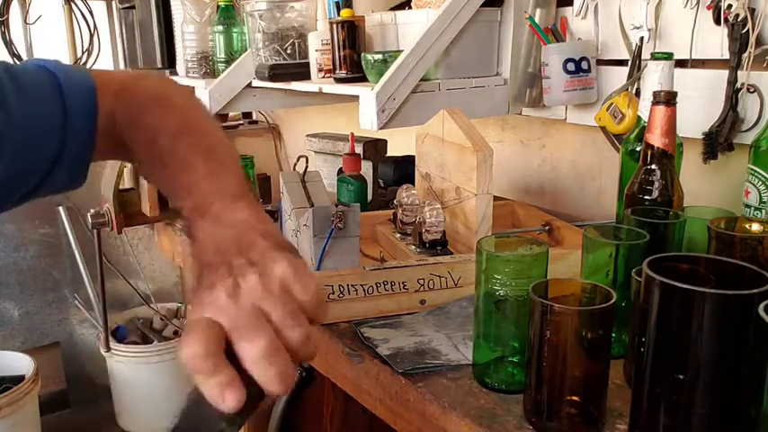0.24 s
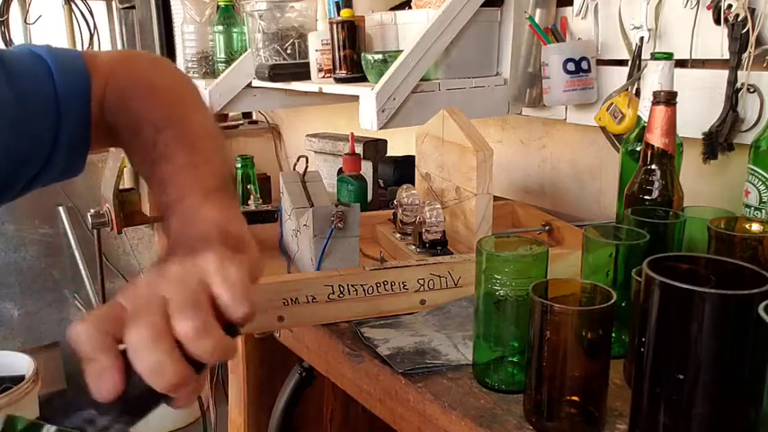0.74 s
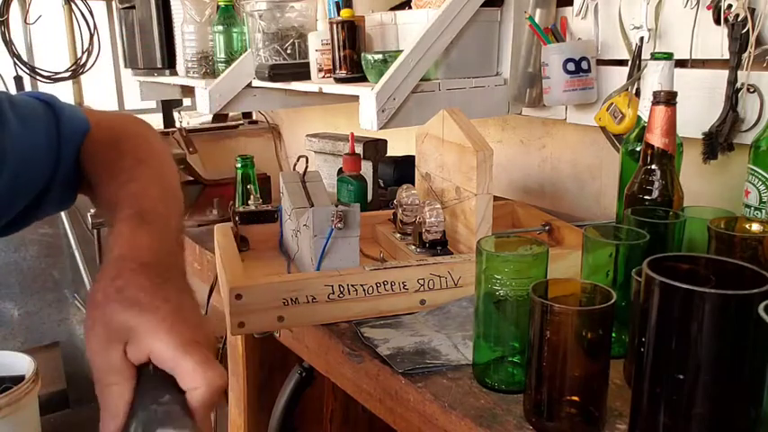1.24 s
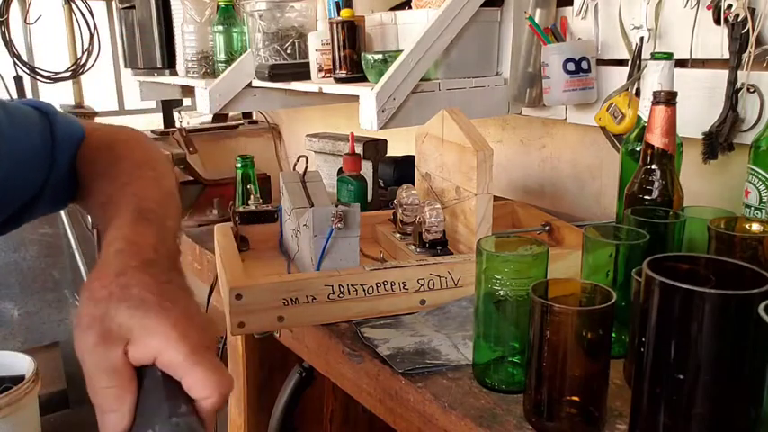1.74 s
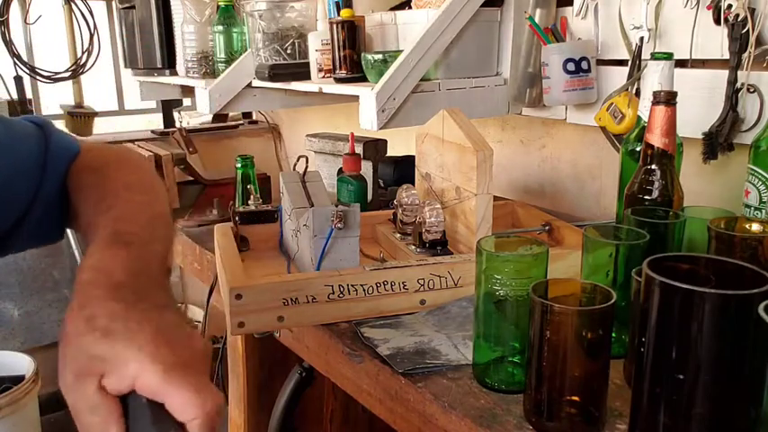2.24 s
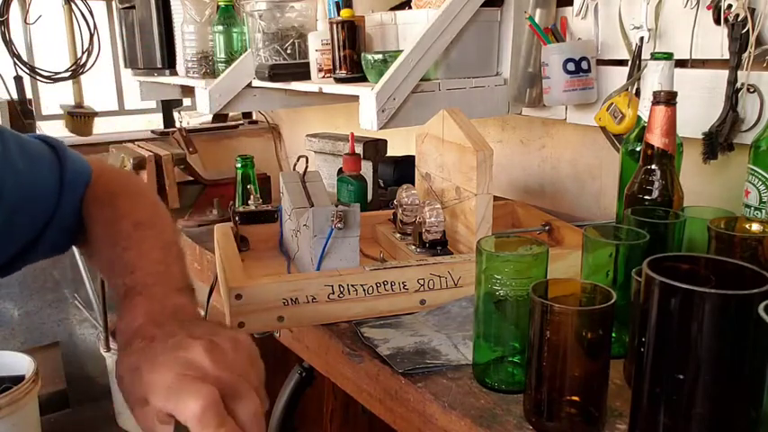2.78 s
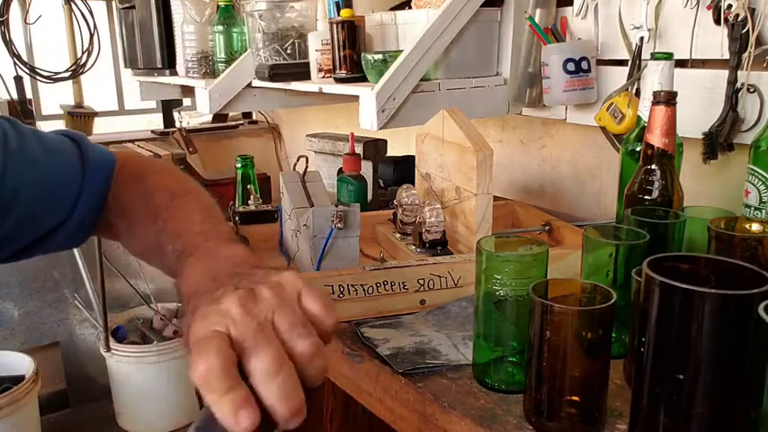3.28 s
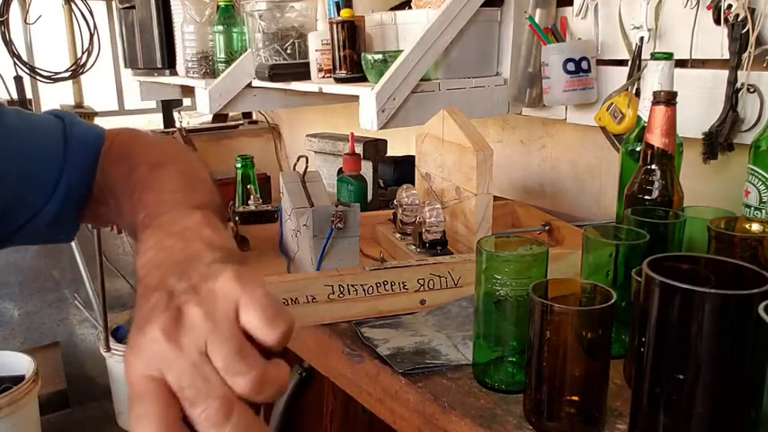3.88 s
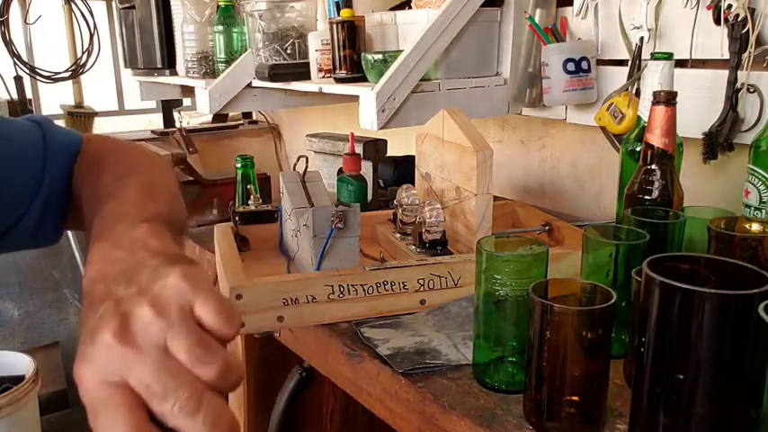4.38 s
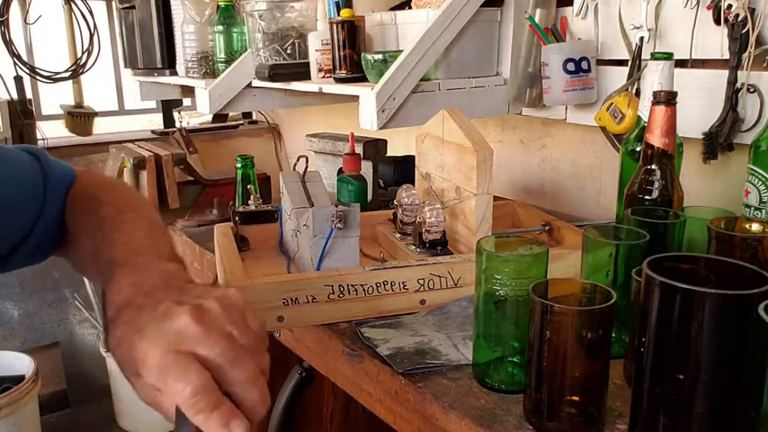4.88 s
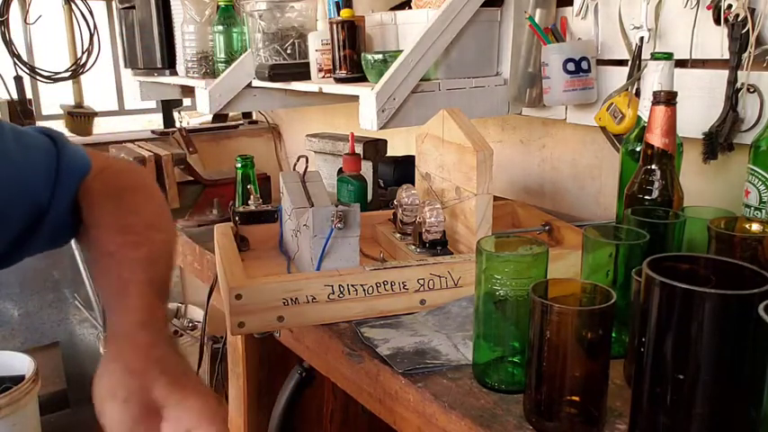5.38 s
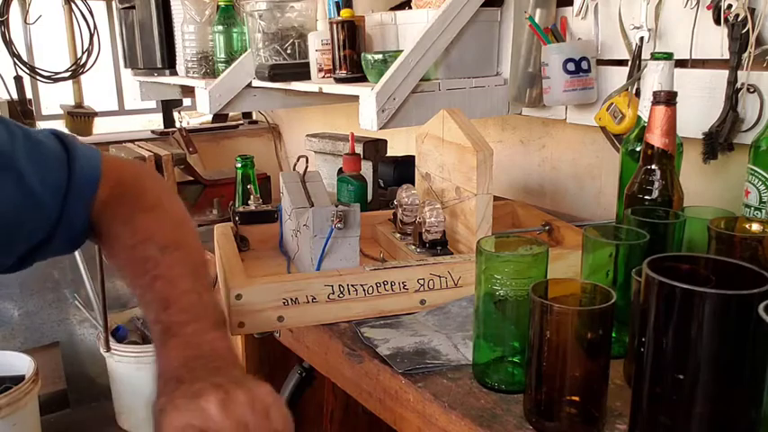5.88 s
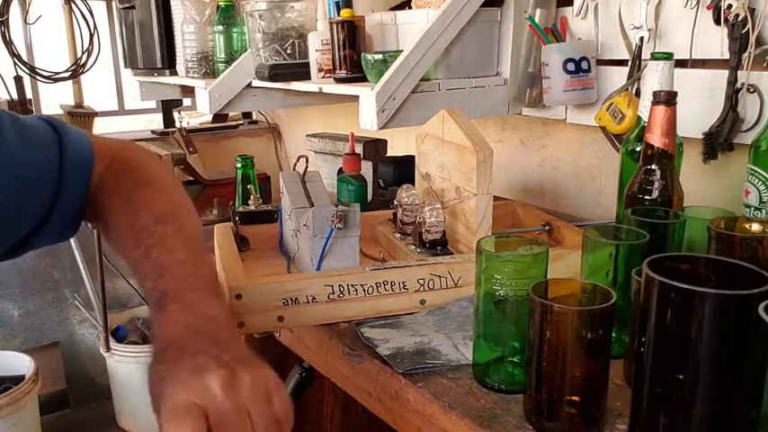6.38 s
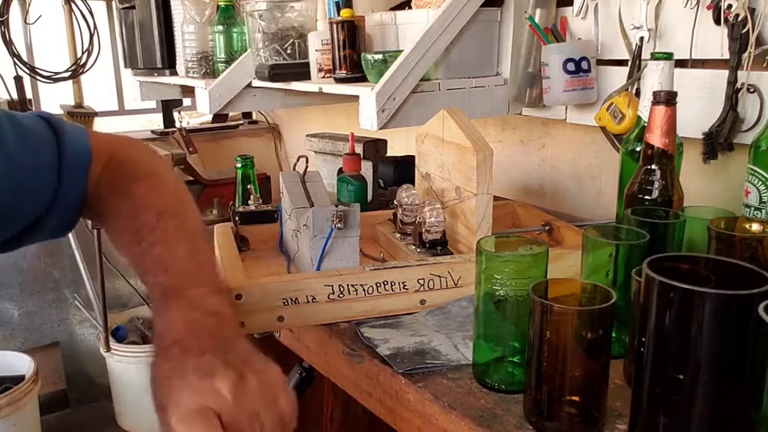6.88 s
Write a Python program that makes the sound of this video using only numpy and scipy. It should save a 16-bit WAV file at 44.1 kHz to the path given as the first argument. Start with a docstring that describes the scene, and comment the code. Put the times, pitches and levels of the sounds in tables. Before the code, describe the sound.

Close, gritty scraping of abrasive paper on glass, alternating slow drags and rapid scrubbing, with a slight hollow bottle resonance and distant motor hum.

```python
"""In a workshop, sandpaper is rubbed along the cut rim of a glass bottle: long sweeps, quick strokes, long sweeps.
Random grain clicks excite the glass, whose hand-damped modes colour the rasp; its level follows the hand.
Friction also stirs the air in the bottle: narrow noise bands sound under the rasp, and jolts make the hollow ring.
Far off a motor, three sine harmonics, slowly gathers speed beside a fading steady tone; shaped noise is the air.
"""
import sys
import numpy as np
from scipy.fft import rfft, irfft, next_fast_len
from scipy.io import wavfile
from scipy.ndimage import map_coordinates

SR = 44100
rng = np.random.default_rng(int(sys.argv[2]) if len(sys.argv) > 2 else 0)


def generate_wav(signal):
    """Clip the signal to [-1, 1] and save it as 16-bit WAV at the path in sys.argv[1]."""
    frames = np.transpose(np.atleast_2d(signal))
    scaled = np.clip(frames, -1, 1) * 32767
    pcm = np.round(scaled).astype(np.int16)
    wavfile.write(sys.argv[1], SR, pcm)


N = 314433
TIME = np.arange(N) / SR
SIZE = next_fast_len(N)
FREQS = np.maximum(np.arange(SIZE // 2 + 1) * SR / SIZE, 1)
FULL_SPEED_DB = -32   # rasp level that counts as full speed of the hand


def from_db(db):
    """Logarithmic level: decibels to amplitude gain."""
    return 10 ** (np.asarray(db) / 20)


def rms_one(x):
    """Power normalisation: scale to a mean square of one."""
    return x / np.sqrt(np.mean(np.abs(x) ** 2) + 1e-20)


def in_time(rows):
    """Linear interpolation: each column of a time table at every sample."""
    s, *columns = np.transpose(rows)
    return [np.interp(TIME, s, column) for column in columns]


def over_hz(points):
    """Logarithmic frequency scale: a table joined by straight lines on that axis."""
    hz, value = np.transpose(points)
    return np.interp(np.log(FREQS), np.log(hz), value)


def drift(rate, size=8192):
    """Low-passed noise: random motion of spread 1, changing up to about rate times a second."""
    hz = np.arange(size // 2 + 1) * SR / N
    slow = irfft(rfft(rng.standard_normal(size)) / (1 + (hz / rate) ** 4), size)
    return np.interp(np.arange(N) * size / N, np.arange(size), rms_one(slow))


def below(hz, order):
    """Butterworth response: magnitude of a low-pass."""
    return 1 / np.sqrt(1 + (FREQS / hz) ** (2 * order))


def coloured(spectrum, gain):
    """Spectral shaping: sound of a spectrum under a gain curve, at unit power."""
    return rms_one(irfft(spectrum * gain, SIZE)[:, :N])


def band(spectrum, hz, width_hz):
    """Lorentzian weighting: sound of one band of a spectrum."""
    offset = (2 * (FREQS - hz) / width_hz) ** 2
    return irfft(spectrum / (1 + offset ** 2), SIZE)[:, :N]


def swell(x, hz, width_hz, lift_db):
    """Time-varying resonance: raise or lower one band by a changing amount."""
    return x + (from_db(lift_db) - 1) * band(rfft(x, SIZE), hz, width_hz)


# likeness of the two channels: [f/Hz, correlation/1]
CHANNEL_LIKENESS = [(60, 0.89), (400, 0.96), (650, 1), (1100, 0.54), (1600, 0.44), (2250, 0.2),
                    (2900, 0.54), (4300, 0.29), (6300, 0.26), (9000, 0.12), (12600, 0.15)]
# lead of the left channel in the direct sound: [f/Hz, phase/rad]
LEFT_LEAD = [(100, 0.2), (780, 0.59), (1850, 0.79), (2220, 1.1), (2600, 0.19), (3300, 0.12), (6300, 0.7),
             (8000, 2.1), (12600, 3)]


def spread(sources):
    """Interaural coherence: one signal arrives directly, two unrelated ones are scattered, one to each side."""
    direct, *scattered = rfft(sources, SIZE)
    alike = over_hz(CHANNEL_LIKENESS)
    direct_pair = np.array([direct, direct * np.exp(-1j * over_hz(LEFT_LEAD))])
    return np.sqrt(alike) * direct_pair + np.sqrt(1 - alike) * np.array(scattered)


# quick strokes, pull and push in turn, each lasting until the next:
# [start t/s, rasp level at the turn/dB, crest level/dB, place of the crest in the stroke/1,
#  bite relative to the rasp/dB, hiss relative to the rasp/dB, hollow level/dB]; the last three at full speed
STROKES = [(1.363, -56, -30, 0.72, -13.5, -8.5, -52), (1.489, -47, -29, 0.4, -13, -7.5, -53),
           (1.598, -40, -31, 0.42, -12, -6, -45.5), (1.704, -41, -29.5, 0.58, -8.0, -2.5, -49.5),
           (1.808, -41, -30, 0.43, -8.5, -5.5, -52), (1.923, -44.5, -32, 0.69, -5, -1.5, -53),
           (2.029, -42, -32.5, 0.58, -6, -3, -45.5), (2.149, -47.5, -29, 0.5, -9.5, -2.5, -46.5),
           (2.245, -40, -29.5, 0.44, -6.5, -3, -48), (2.346, -44, -28.5, 0.64, -15, -5.5, -60),
           (2.455, -40.5, -31.5, 0.53, -11.5, -4.5, -45), (2.556, -43.5, -33.5, 0.66, -12.5, -7.5, -51),
           (2.658, -46, -37.5, 0.14, -11.5, -8.5, -52), (2.836, -48, -30, 0.63, -11, -6, -55),
           (2.941, -43, -31.5, 0.33, -10.5, -2.5, -49.5), (3.064, -53, -36, 0.48, -9, -5, -57),
           (3.176, -51, -33, 0.49, -8.5, -5.5, -43), (3.321, -56, -30.5, 0.6, -6, -3.5, -49),
           (3.435, -39.5, -27, 0.41, -10, -7.5, -46.5), (3.554, -48, -30, 0.61, -6, -1.5, -49),
           (3.669, -41, -28, 0.42, -9, -4, -45), (3.779, -44.5, -28.5, 0.6, -7.5, -5, -48.5),
           (3.892, -43, -29.5, 0.39, -5, -0.5, -42.5), (4.012, -50, -33.5, 0.63, -4, -4, -49),
           (4.11, -48, -27.5, 0.48, -9, -3.5, -47), (4.245, -43.5, -27, 0.67, -4.5, -3, -50),
           (4.367, -39, -29, 0.36, -3, -5, -51.5), (4.479, -44.5, -31.5, 0.57, -3, -5, -44),
           (4.587, -42, -32, 0.4, -4.5, -2.5, -51.5), (4.693, -48, -32.5, 0.59, -1.5, -4, -42),
           (4.803, -44.0, -34.5, 0.52, -6.5, -7.5, -43.5), (4.895, -50, -36.5, 0.57, -10.5, -3, -59),
           (5.002, -48.5, -34.5, 0.37, -8, -1, -45), (5.156, -51, -39, 0.45, -8.5, -3, -51)]
STROKES_END_S, STROKES_END_DB = 5.247, -50


def in_quick_strokes():
    """Gating: true while the hand swings quickly."""
    return (TIME > STROKES[0][0]) & (TIME < STROKES_END_S)


def quick_strokes(rise_shape, fall_shape):
    """Reciprocating motion: the level in dB follows a warped half sine per stroke, leaning early or late."""
    start, turn_db, crest_db, crest_place, *shares = np.transpose(STROKES)
    turns = np.append(start, STROKES_END_S)
    crests = start + crest_place * np.diff(turns)
    marks = np.sort(np.append(turns, crests))
    # whole numbers are turns, halves are crests
    swing = np.interp(TIME, marks, np.arange(len(marks)) / 2)
    nearest_turn = np.round(swing).astype(int)
    low_db = np.append(turn_db, STROKES_END_DB)[nearest_turn]
    high_db = crest_db.take(swing.astype(int), mode="clip")
    shape = np.where(swing % 1 < .5, rise_shape, fall_shape)
    speed = np.abs(np.sin(np.pi * swing)) ** shape
    rasp_db = low_db + (high_db - low_db) * speed
    return [rasp_db, *[np.interp(TIME, crests, db) for db in shares]]


# long sweeps; the grit catches faster than the hand slows, and the resting paper still whispers:
# [start t/s, end t/s, time to catch t/s, time to slow down t/s, whisper level around the start/dB]
LONG_SWEEPS = [(0.042, 0.755, 0.02, 0.059, -52.5), (0.786, 1.324, 0.036, 0.059, -50),
               (5.253, 5.642, 0.0066, 0.053, -46), (5.662, 6.349, 0.022, 0.06, -58.5),
               (6.373, 6.765, 0.025, 0.075, -51), (6.773, 6.83, 0.029, 0.057, -48.5),
               (6.853, 7.3, 0.03, .08, -53)]
# speed of the hand in the sweeps, as the level of the rasp: [t/s, level/dB]
SWEEP_RASP = [(0.16, -30), (0.21, -33.5), (0.28, -30), (0.42, -33), (0.49, -29.5), (0.69, -35.5),
              (0.83, -30.5), (0.92, -27.5), (1.05, -34), (1.13, -29.5), (1.205, -34.5), (1.255, -31),
              (5.26, -40), (5.3, -33.5), (5.38, -36), (5.49, -30.5), (5.57, -42.5), (5.61, -43.5),
              (5.69, -31.5), (5.8, -31.5), (5.97, -36.5), (6.06, -33), (6.22, -33.5), (6.3, -36.5),
              (6.41, -30.5), (6.5, -29), (6.59, -35), (6.67, -30.5), (6.8, -33.5), (6.89, -29), (7.13, -29)]


def sweeps():
    """Sliding friction with start and stop: the grit catches, the hand runs on, slows and stops."""
    speed_db, = in_time(SWEEP_RASP)
    whisper_db = in_time(LONG_SWEEPS)[-1]
    moving = np.zeros(N)
    for start, end, catch_s, slow_s, _ in LONG_SWEEPS:
        catching = np.clip((TIME - start) / catch_s, 0, 1)
        slowing = np.clip((end - TIME) / slow_s, 0, 1)
        moving += catching * slowing
    return 20 * np.log10(np.hypot(moving * from_db(speed_db), from_db(whisper_db)))


# the paper snags on the rim, and the rasp jumps for a moment: [t/s, lift of the level/dB]
PAPER_SNAGS = [(0.158, 3), (1.374, 8.5), (1.505, 5), (3.182, 6.5), (3.346, 4.5), (5.257, 2), (5.755, 3),
               (6.869, 2)]


def snags(decay_s):
    """Stick and release: a coarse grain catches at once and tears free, an exponentially dying lift in dB."""
    lift_db = np.zeros(N)
    for s, db in PAPER_SNAGS:
        lift_db += db * (TIME >= s) * np.exp(-np.clip((TIME - s) / decay_s, 0, 20))
    return lift_db


# pressure of the hand in the sweeps, as the coarse bite at full speed: [t/s, level relative to the rasp/dB]
SWEEP_BITE = [(0.06, -15.5), (0.17, -27), (0.36, -7.5), (0.85, -7), (1.12, -25), (1.35, -13.5),
              (5.25, -8.5), (5.5, -16.5), (5.6, 0.5), (5.72, -19), (5.92, -26), (6.23, -7), (6.52, -24.5),
              (6.8, -7), (6.92, -25.5), (7.13, -7.5)]
# fine hiss in the sweeps at full speed: [t/s, level relative to the rasp/dB]
SWEEP_HISS = [(0.25, -3.5), (0.5, -8.5), (1.0, -4.5), (1.3, -7), (5.25, -2), (5.55, -5.5), (6.0, -6),
              (7.13, -5.5)]
# hollow in the sweeps at full speed, as the hand opens and covers the mouth: [t/s, level/dB]
SWEEP_RING = [(0.1, -53.5), (0.29, -48), (0.65, -56), (1.05, -56), (1.12, -49), (1.26, -47.5), (1.35, -47),
              (5.3, -59), (5.57, -51), (5.72, -78), (5.84, -50.5), (6.01, -58.5), (6.28, -42),
              (6.58, -57.5), (6.75, -49.5), (7.13, -50)]
# extra dB for each dB of rasp; in the quick strokes the hollow follows more, and dies at each turn
BITE_FOLLOWS, HISS_FOLLOWS = 0.18, 0.21
HOLLOW_FOLLOWS, TURN_FADES = 0.37, 0.28


def hand():
    """Speed-dependent excitation: levels of rasp, bite, hiss and hollow, the last three rising with the rasp."""
    quick = in_quick_strokes()
    slow_levels = [sweeps(), *in_time(SWEEP_BITE), *in_time(SWEEP_HISS), *in_time(SWEEP_RING)]
    quick_levels = quick_strokes(rise_shape=0.59, fall_shape=0.78)
    rasp_db, bite_db, hiss_db, hollow_db = np.where(quick, quick_levels, slow_levels)
    rasp_db = rasp_db + snags(decay_s=0.0087)
    speed_db = rasp_db - FULL_SPEED_DB
    bite_db = bite_db + BITE_FOLLOWS * speed_db
    hiss_db = hiss_db + HISS_FOLLOWS * speed_db
    hollow_db = hollow_db + (HOLLOW_FOLLOWS + TURN_FADES * quick) * speed_db
    return rasp_db, bite_db, hiss_db, hollow_db


def grit(per_s, size_db):
    """Shot noise: thousands of grains a second catch and let go, a few much larger than the rest."""
    caught = rng.random(N) < per_s / SR
    sizes = from_db(size_db * np.minimum(rng.exponential(1, N), 5))
    return caught * sizes * rng.choice([-1, 1], (3, N))


# spectrum of a light pass of grit on the glass: [f/Hz, relative level per Hz/dB]
LIGHT_GRIT = [(250, -25), (650, -12), (1050, -19), (1400, -6.5), (1800, -3.5), (2080, -7.5), (2380, -5.5),
              (2700, -1.5), (4500, -1), (6400, -2), (7950, -3.5), (8450, -5.5), (10000, -5.5),
              (11700, -3.5), (13200, -11.5)]
# spectrum of the coarse bite of a hard push: [f/Hz, relative level per Hz/dB]
COARSE_BITE = [(250, -22), (600, -9), (820, -8), (1050, -1), (1300, 1), (1600, -5.5), (2200, -7),
               (2700, -8), (3500, -19), (8000, -30)]
# glass modes, damped by the grip, and a notch between them: [f/Hz, width f/Hz, lift/dB]
GLASS_MODES = [(1025, 46, 0.5), (1150, 46, 2), (1530, 147, 5.5), (2025, 31, 6), (2800, 380, 2.5),
               (3100, 130, 2), (3270, 90, -3.5), (3390, 230, 4.5), (4017, 300, 4), (4290, 170, 4),
               (4880, 110, 0.5), (12500, 820, 11)]


def sanding(rasp_db, bite_db, hiss_db, hiss_above_hz, bite_judder_db, hiss_flutter_db, bite_trim_db, hiss_trim_db):
    """Source and filter: grain clicks pass through the glass; a hard push adds bite, a light fast one hiss."""
    glass_db = sum(db / (1 + (2 * (FREQS - hz) / width) ** 2) for hz, width, db in GLASS_MODES)
    fine = spread(grit(per_s=26000, size_db=2.0)) * from_db(over_hz(LIGHT_GRIT) + glass_db)
    coarse = spread(grit(per_s=9000, size_db=1.75))
    bite = coloured(coarse, from_db(over_hz(COARSE_BITE) + glass_db))
    bite = bite * from_db(bite_db + bite_trim_db + bite_judder_db * drift(39))
    # the fine grit is split by power into rasp and hiss
    not_hiss = below(hiss_above_hz, order=16)
    rasp = coloured(fine, not_hiss)
    hiss = coloured(fine, np.sqrt(1 - not_hiss ** 2))
    hiss = hiss * from_db(hiss_db + hiss_trim_db + hiss_flutter_db * drift(22))
    return (bite + rasp + hiss) * from_db(rasp_db)


# the fingers shift and free or damp two clear modes; the lower one: [t/s, extra lift/dB]
LOWER_MODE = [(0.2, 0), (0.5, 2.5), (1.05, -1.5), (1.5, 1.5), (2.6, -0.5), (3.15, 1.5), (3.5, -3.5),
              (4.6, -2), (5.3, 3.5), (5.88, -3.5), (6.15, 2.5), (6.5, -4), (6.75, 6), (6.92, -5),
              (7.1, 1.5)]
# and the higher one: [t/s, extra lift/dB]
HIGHER_MODE = [(0.15, 7), (0.45, -1), (0.9, 0), (1.5, 0.5), (2.6, 5), (3.1, 2.5), (3.7, -2), (4.5, -2),
               (5.0, -3), (5.45, 6.5), (5.95, 2), (6.3, 1), (7.0, -1.5)]
# sheen in a broad band near 6.6 kHz: [t/s, extra lift/dB]
TREBLE_SHEEN = [(0.3, 1.5), (0.6, -2.5), (1.12, 1.5), (1.45, -3), (2.05, 1.5), (2.75, -2), (3.55, 2.5),
                (4.25, 1), (4.4, -1), (4.62, 1), (5.2, 0.5), (5.8, 2), (6.15, -1.5), (6.53, 1), (7.1, 0)]
SLOW_DRAG_DB = 0.46   # extra dB near 1770 Hz for each dB that the hand slows
LOOSE_GRIP_DB = 0.5   # in the sweeps a looser grip frees two more modes
# a band near 2240 Hz is weaker when there is little bite: mean lift at the middle bite, and dB for each dB of bite
BAND_DB, MIDDLE_BITE_DB, BAND_FOLLOWS = -2.5, -17, 0.22


def handled_glass(x, rasp_db, bite_db):
    """Variable modal damping: a slow drag lifts a low band, little bite weakens another, a loose grip frees modes."""
    slowing_db = np.clip(FULL_SPEED_DB - rasp_db, -3, 14)
    loose_db = LOOSE_GRIP_DB * ~in_quick_strokes()
    # this band also wanders at random
    bite_band_db = BAND_DB + BAND_FOLLOWS * (bite_db - MIDDLE_BITE_DB) + 3.1 * drift(27)
    x = swell(x, hz=1770, width_hz=360, lift_db=SLOW_DRAG_DB * slowing_db)
    x = swell(x, hz=1910, width_hz=510, lift_db=loose_db)
    x = swell(x, hz=3350, width_hz=380, lift_db=loose_db)
    x = swell(x, hz=2240, width_hz=480, lift_db=bite_band_db)
    x = swell(x, hz=2830, width_hz=340, lift_db=in_time(LOWER_MODE)[0])
    x = swell(x, hz=4410, width_hz=260, lift_db=in_time(HIGHER_MODE)[0])
    return swell(x, hz=6560, width_hz=2200, lift_db=in_time(TREBLE_SHEEN)[0])


def flicker(x, lowest_hz, highest_hz, share, depth_db, rate, count):
    """Random band modulation: narrow treble bands flicker up and down at random."""
    spectrum = rfft(x, SIZE)
    for hz in np.geomspace(lowest_hz, highest_hz, count):
        x = x + (from_db(depth_db * drift(rate)) - 1) * band(spectrum, hz, share * hz)
    return x


def near_echoes(x, share, shortest_s, longest_s, wander_s, wander_rate, count):
    """Multipath interference: short echoes whose delays wander slowly at random and shift the colour."""
    out = x.copy()
    for delay_s in np.geomspace(shortest_s, longest_s, count):
        path_s = np.abs(delay_s + wander_s * drift(wander_rate))
        late = np.arange(N) - SR * path_s
        out += share * np.array([map_coordinates(side, [late], order=3) for side in x])
    return out / np.sqrt(1 + count * share ** 2)


# balance of the rasp: [f/Hz, left minus right level/dB]
BALANCE = [(500, -1), (1100, -2.1), (4000, -0.5), (9500, -2), (12000, -0.2)]
# the bottle swings out to the left and back: [t/s, delay of the right channel t/s]
BOTTLE_SWING = [(0.1, 0), (0.65, 5e-5), (0.9, 6e-5), (1.4, 1e-5), (2.2, 0), (5.9, 0), (6.35, 4.5e-5),
                (6.9, 1.5e-5)]


def placed(x, trim_db):
    """Interaural level and time difference: the rasp leans right, reaching that side later on a left swing."""
    side_db = over_hz(BALANCE) * [[.5], [-.5]]
    left, right = irfft(rfft(x, SIZE) * from_db(trim_db + side_db), SIZE)[:, :N]
    delay_s, = in_time(BOTTLE_SWING)
    late = np.arange(N) - SR * delay_s
    return np.array([left, map_coordinates(right, [late], order=5)])


# pitch of the hollow, which shifts as the hand covers the mouth: [t/s, f/Hz]
HOLLOW_PITCH = [(0.2, 422), (0.45, 435), (0.7, 460), (0.95, 412), (1.27, 432), (1.72, 400), (1.82, 435),
                (2.15, 398), (2.3, 412), (2.75, 402), (2.92, 455), (3.05, 415), (3.28, 412), (3.42, 450),
                (3.72, 428), (3.9, 450), (4.2, 435), (4.38, 470), (4.52, 450), (4.82, 485), (5.1, 445),
                (5.55, 405), (5.9, 402), (6.25, 422), (6.7, 385), (7.1, 405)]
GRIP_DAMPS_DB = 9   # in the quick strokes a tighter grip damps the narrow ring of the hollow


def hollow(level_db, width_hz, ring_hz, ring_width_hz, ring_db, side_db, trim_db, evenness):
    """Cavity resonance: friction stirs the air into a breathy band that follows the hand, with a narrow ring."""
    pitch, = in_time(HOLLOW_PITCH)

    def resonance(phase, width):
        """Narrow-band noise around a turning phase, its random swells partly levelled."""
        motion = drift(width / 2) + 1j * drift(width / 2)
        wave = (motion * np.exp(1j * phase)).real
        return rms_one(wave / (.5 + np.abs(motion) ** 2) ** evenness)

    phase = 2 * np.pi * np.cumsum(pitch) / SR
    mid = resonance(phase, width_hz)
    side = resonance(phase, width_hz) * [[1], [-1]]
    core_db = ring_db - GRIP_DAMPS_DB * in_quick_strokes()
    core = from_db(core_db) * resonance(2 * np.pi * ring_hz * TIME, ring_width_hz)
    return from_db(level_db + trim_db) * (mid + core + from_db(side_db) * side)


# the bottle jolts in the grip: [t/s, level before the rise and decay/dB]
GRIP_JOLTS = [(1.262, -39), (1.672, -37), (2.898, -34), (3.383, -35), (3.61, -34), (3.928, -32),
              (4.172, -30), (4.509, -31), (4.753, -42), (5.051, -35), (5.323, -31.5), (6.412, -34),
              (6.898, -34)]


def jolts(rise_s, t60):
    """Free decay: each jolt sets the hollow ringing for a moment, at its pitch of that instant."""
    out = np.zeros(N)
    for s, db in GRIP_JOLTS:
        age = np.maximum(TIME - s, 0)
        hz = np.interp(s, *np.transpose(HOLLOW_PITCH))
        decay = from_db(db - 60 * np.minimum(age / t60, 3))
        out += decay * (1 - np.exp(-age / rise_s)) * np.sin(2 * np.pi * hz * age)
    return out


# distant motor gathering speed: [t/s, fundamental f/Hz]
MOTOR_PITCH = [(0.0, 38.75), (1.35, 39.46), (4.15, 47.5), (6.5, 52.4)]
# its hum swells and fades, before the trim:
# [t/s, fundamental level/dB, second harmonic level/dB, third harmonic level/dB]
MOTOR_HARMONICS = [(0.0, -56.5, -62, -77), (0.55, -53, -68, -76), (1.1, -65, -62, -59),
                   (1.65, -49, -59, -70), (2.1, -55, -56.5, -66), (2.55, -45.5, -54, -55.5),
                   (2.78, -46.5, -55, -66), (3.05, -41, -56, -55.5), (3.55, -64, -53.5, -58),
                   (3.8, -66, -56, -77), (4.15, -50, -67, -81), (4.85, -53.5, -65, -68),
                   (5.75, -74, -59, -71), (6.35, -61, -62, -77), (6.9, -69, -84, -80)]


def motor(trim_db, waver_db):
    """Harmonic series: three low partials swell and fade as their pitch creeps up; the upper ones waver most."""
    pitch, = in_time(MOTOR_PITCH)
    phase = 2 * np.pi * np.cumsum(pitch) / SR
    out = np.zeros(N)
    for k, db in enumerate(in_time(MOTOR_HARMONICS), 1):
        gain = np.sqrt(2) * from_db(db + trim_db + k * waver_db * drift(5))
        out += gain * np.sin(k * phase + rng.uniform(0, 2 * np.pi))
    return out


# a second hum, steady in pitch, that fades: [t/s, level/dB]
SECOND_HUM = [(1.8, -63.5), (3.6, -76)]


def steady_hum(hz):
    """Pure tone: one faint low sine that beats against the motor's second harmonic as that passes it."""
    level_db, = in_time(SECOND_HUM)
    return np.sqrt(2) * from_db(level_db) * np.sin(2 * np.pi * hz * TIME)


# spectrum of the workshop air: [f/Hz, relative level per Hz/dB]
AIR_SPECTRUM = [(20, -16), (40, 0), (80, 0.5), (130, -7), (220, -7), (400, -9), (1000, -11.5),
                (4000, -25.5), (13000, -34)]


def workshop_air(level_db):
    """Shaped broadband noise: a dull, wide background with the lowest rumble taken out."""
    noise = spread(rng.standard_normal((3, N)))
    above_rumble = np.sqrt(1 - below(26, order=4) ** 2)
    return from_db(level_db) * coloured(noise, from_db(over_hz(AIR_SPECTRUM)) * above_rumble)


def scene():
    """Superposition: the bottle close by, the motor and the air of the workshop behind it."""
    rasp_db, bite_db, hiss_db, hollow_db = hand()
    paper = sanding(rasp_db, bite_db, hiss_db, hiss_above_hz=7810, bite_judder_db=1.0, hiss_flutter_db=2.0,
                    bite_trim_db=2.4, hiss_trim_db=0.14)
    paper = handled_glass(paper, rasp_db, bite_db)
    paper = flicker(paper, lowest_hz=2890, highest_hz=10960, share=0.07, depth_db=2.0, rate=13, count=13)
    paper = near_echoes(paper, share=0.25, shortest_s=0.0007046, longest_s=.0065,
                        wander_s=0.000176, wander_rate=2.85, count=5)
    paper = placed(paper, trim_db=-0.5)
    bottle = hollow(hollow_db, width_hz=83, ring_hz=422.6, ring_width_hz=11.0, ring_db=-5.5,
                    side_db=-16.0, trim_db=-0.5, evenness=0.27)
    bottle = bottle + jolts(rise_s=0.0016, t60=0.11)
    background = motor(trim_db=-1.5, waver_db=0.25) + steady_hum(hz=90.5) + workshop_air(level_db=-57.5)
    return paper + bottle + background


def record(dry):
    """Band limitation: a steep low-pass cuts the top."""
    return irfft(rfft(dry, SIZE) * below(13060, order=160), SIZE)[:, :N]


dry = scene()
out = record(dry)
generate_wav(out)
```